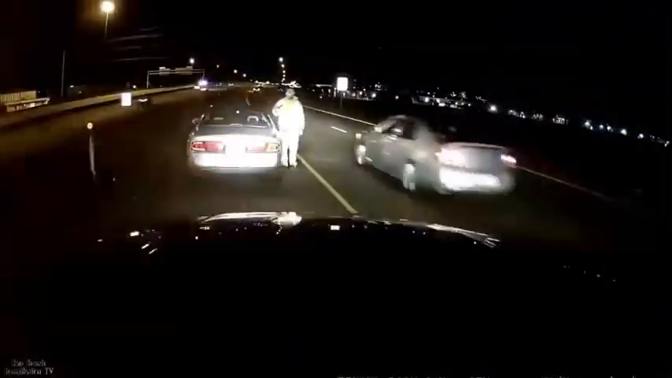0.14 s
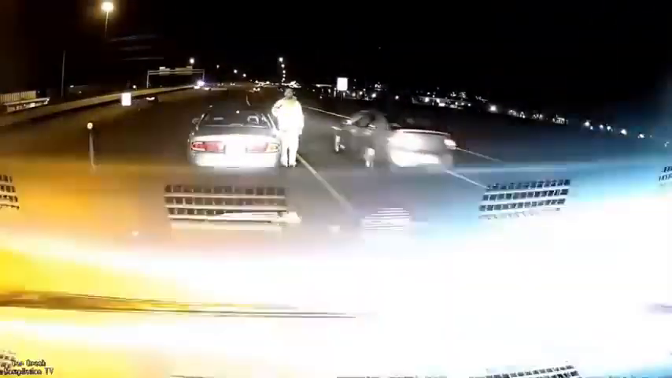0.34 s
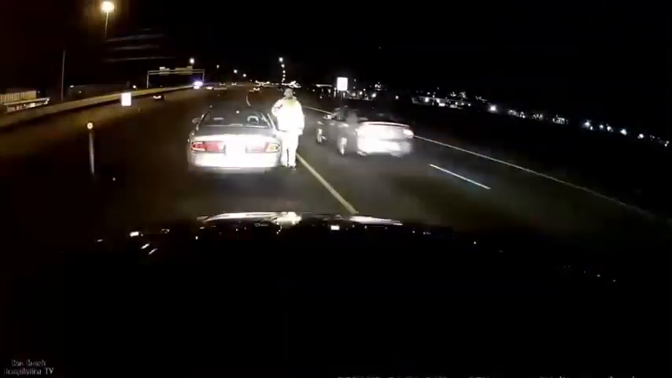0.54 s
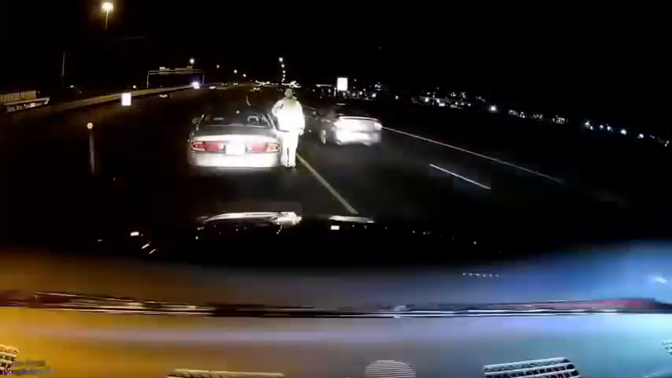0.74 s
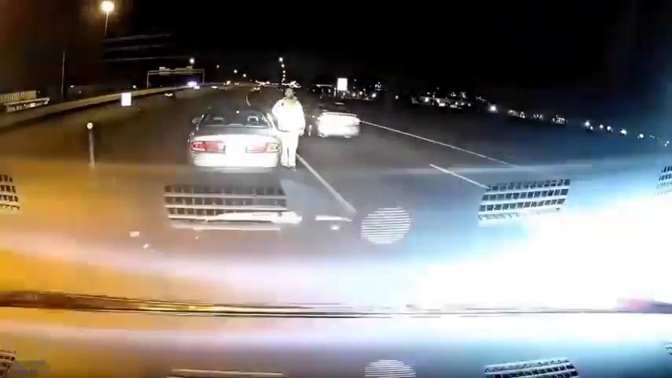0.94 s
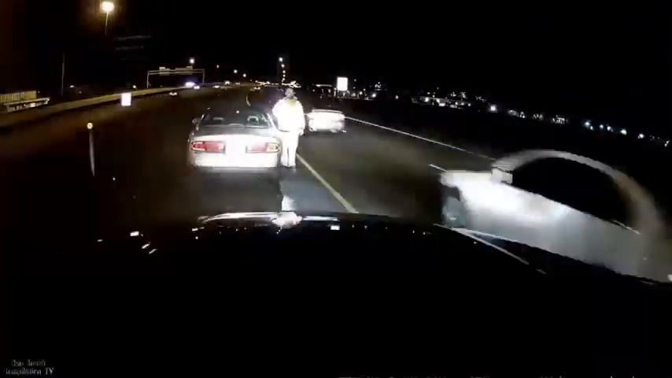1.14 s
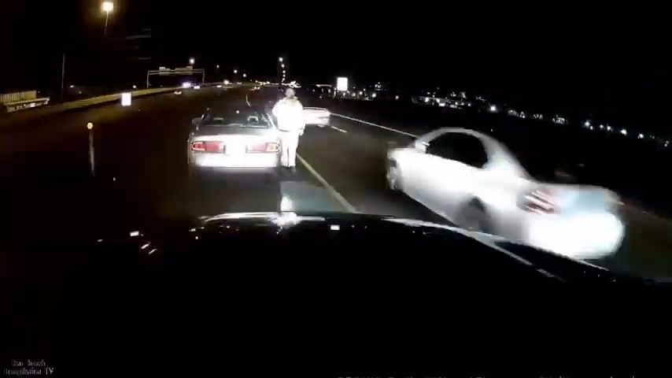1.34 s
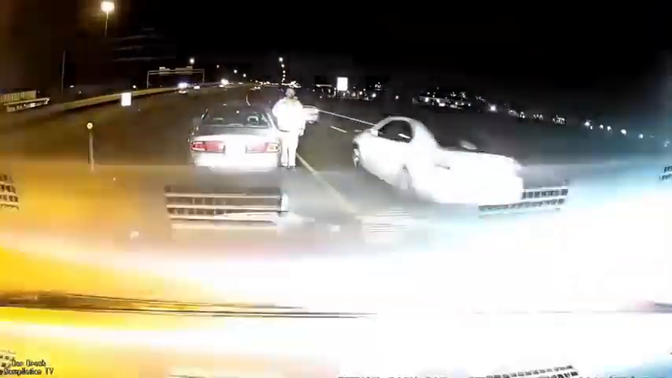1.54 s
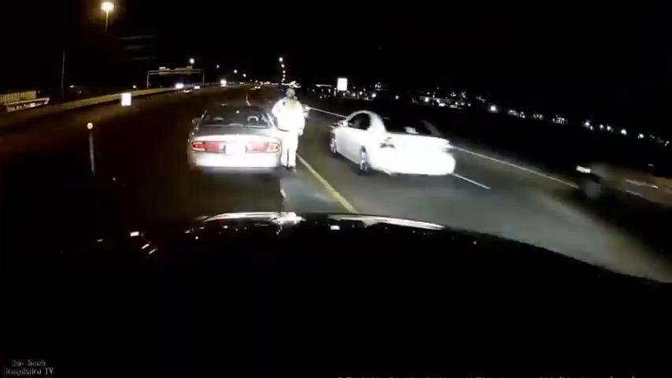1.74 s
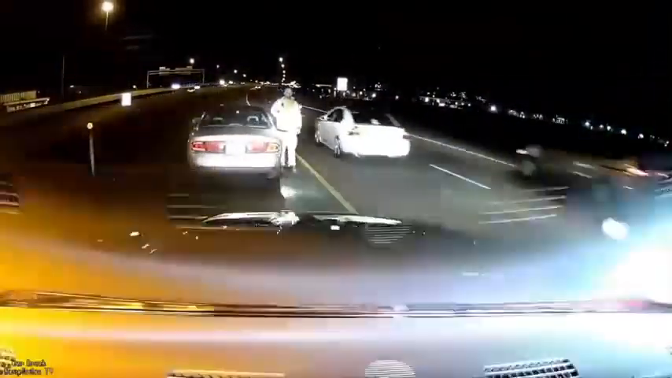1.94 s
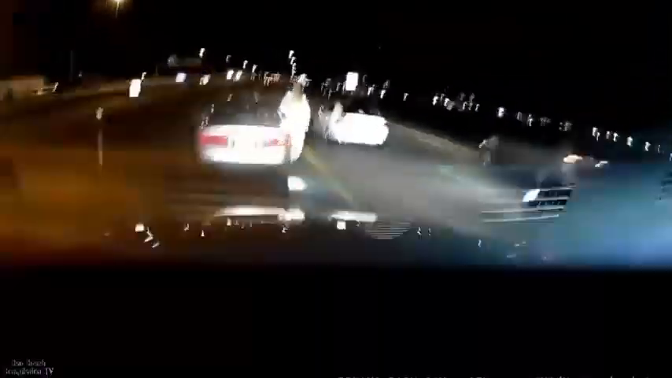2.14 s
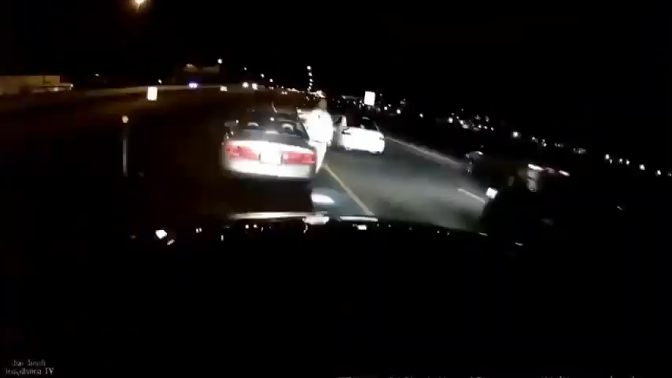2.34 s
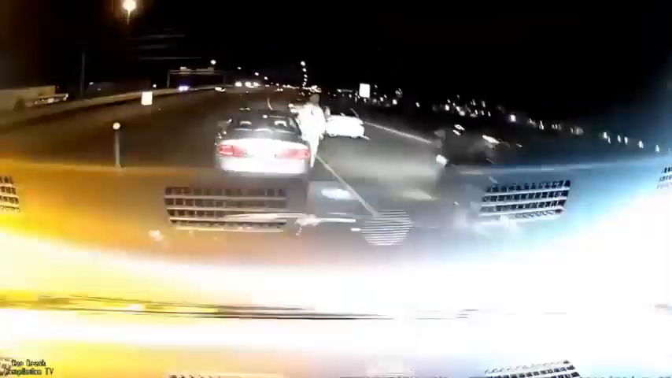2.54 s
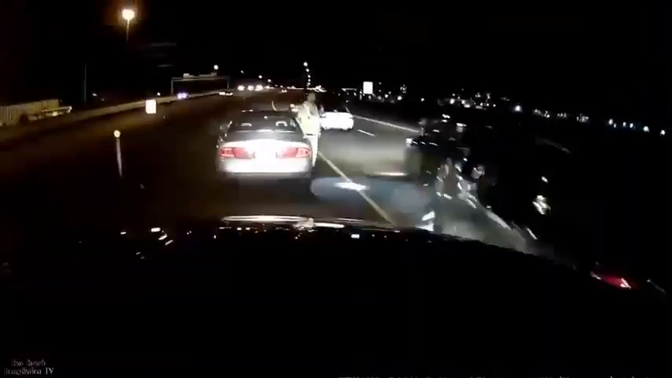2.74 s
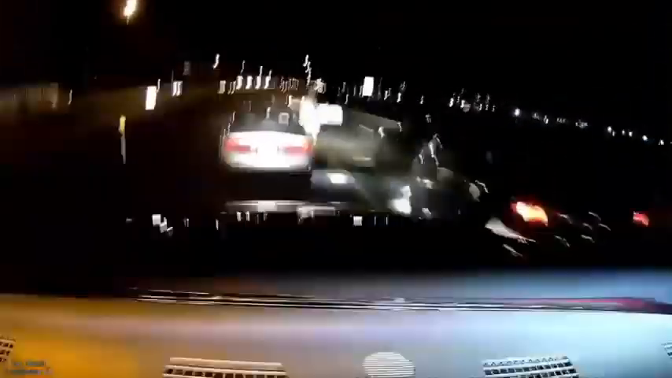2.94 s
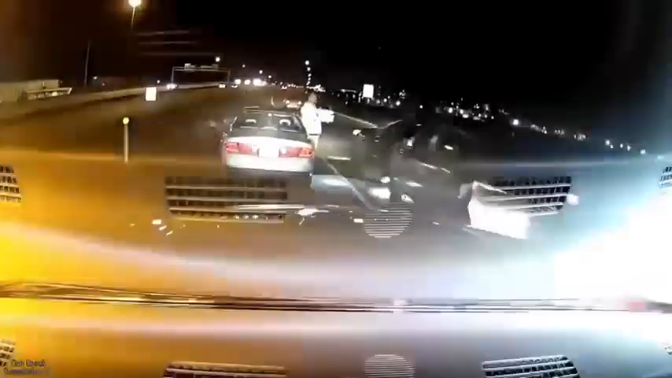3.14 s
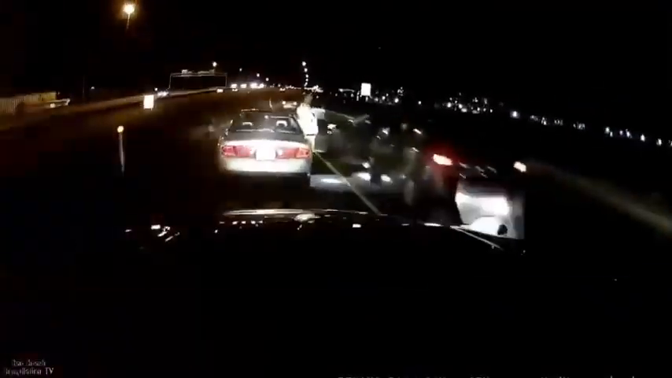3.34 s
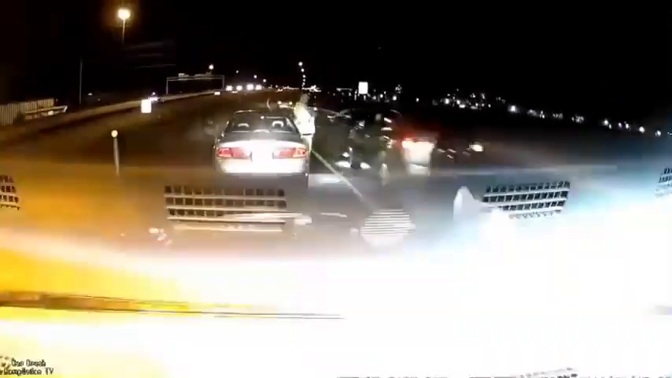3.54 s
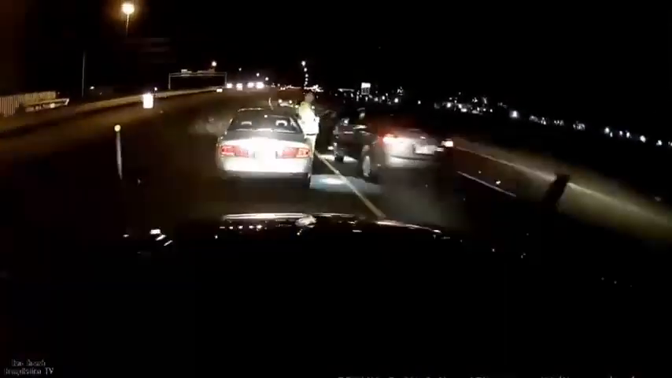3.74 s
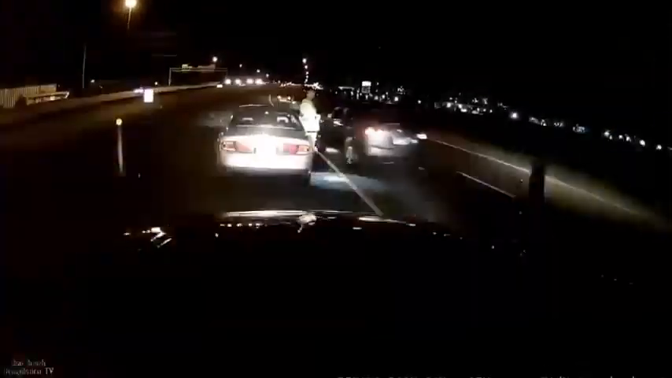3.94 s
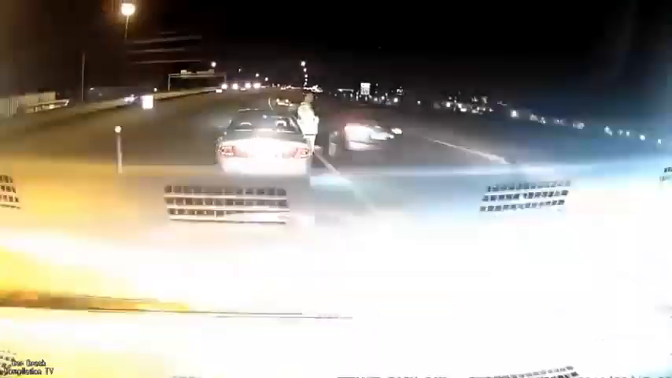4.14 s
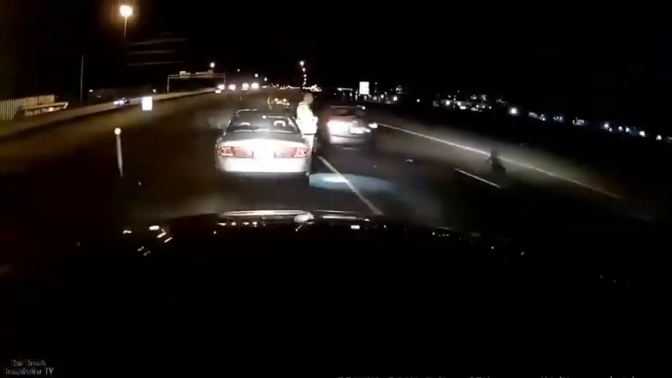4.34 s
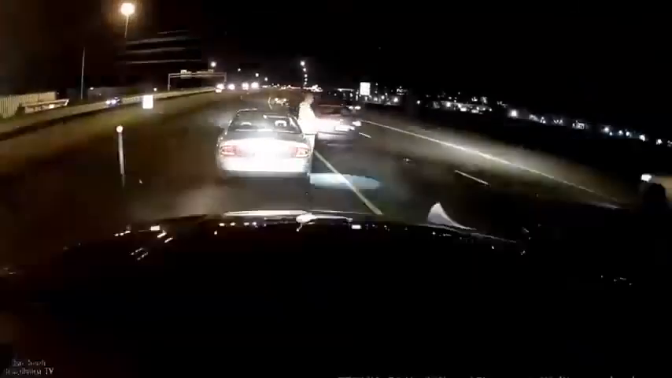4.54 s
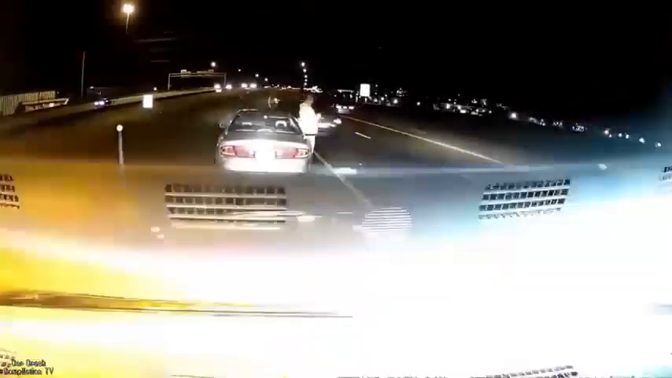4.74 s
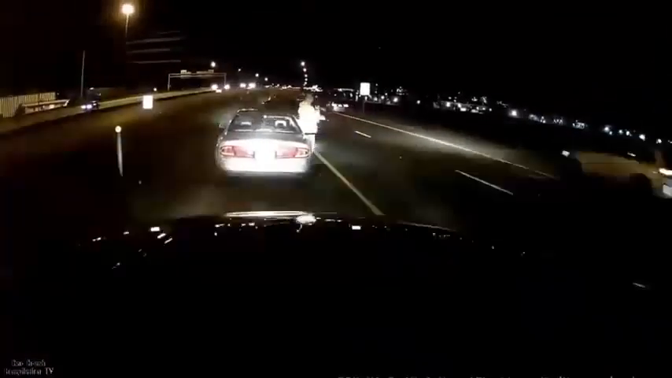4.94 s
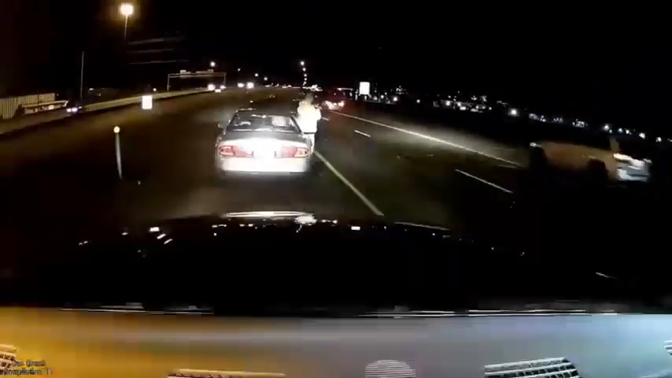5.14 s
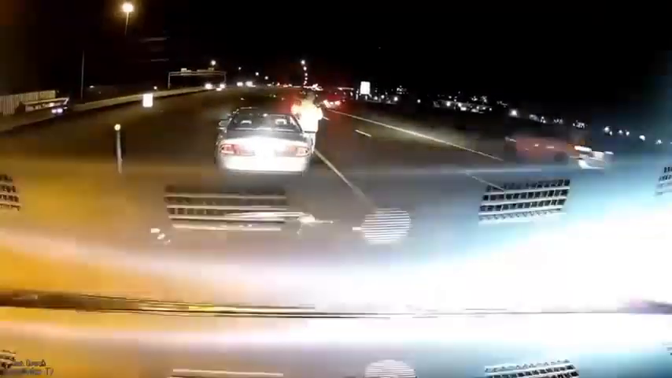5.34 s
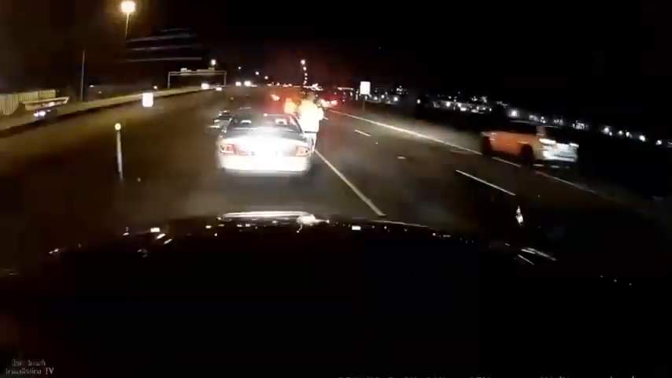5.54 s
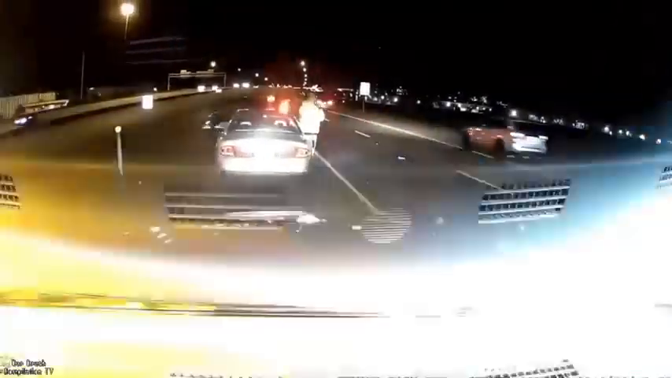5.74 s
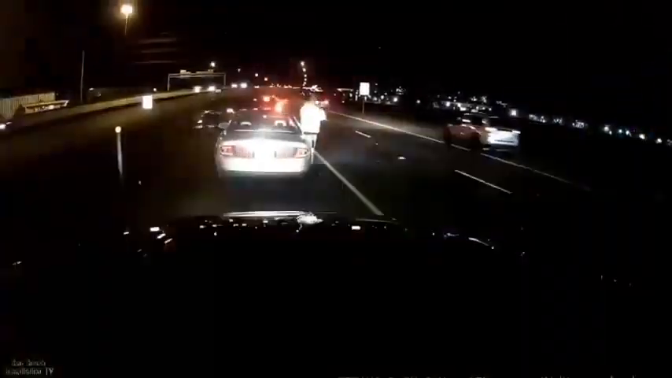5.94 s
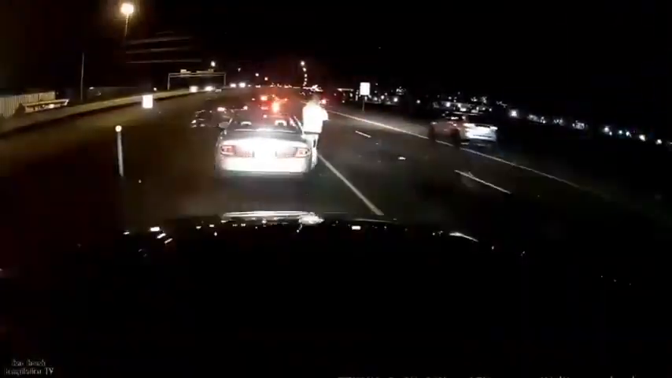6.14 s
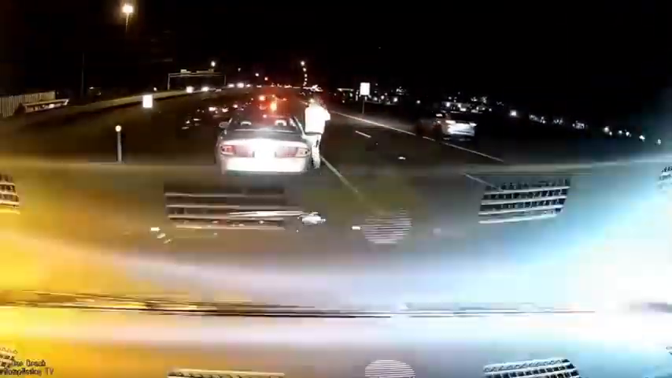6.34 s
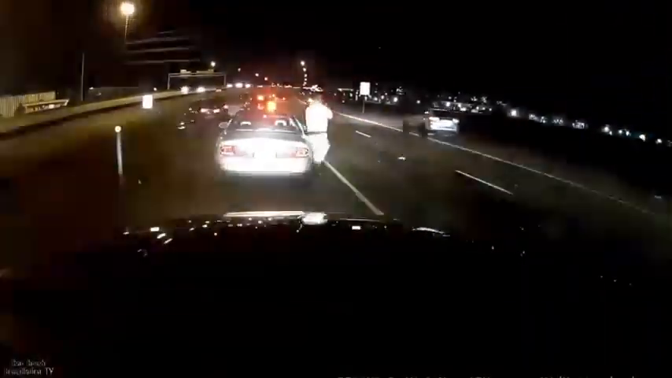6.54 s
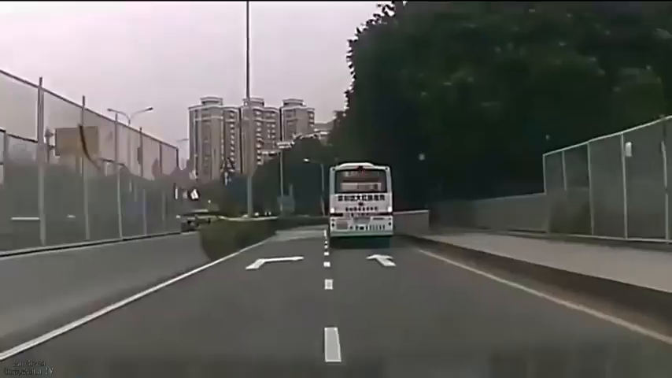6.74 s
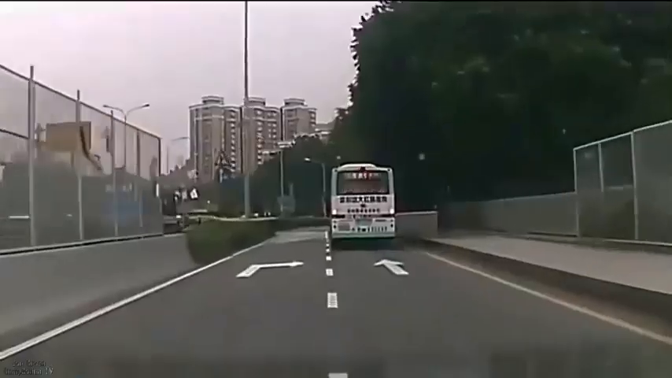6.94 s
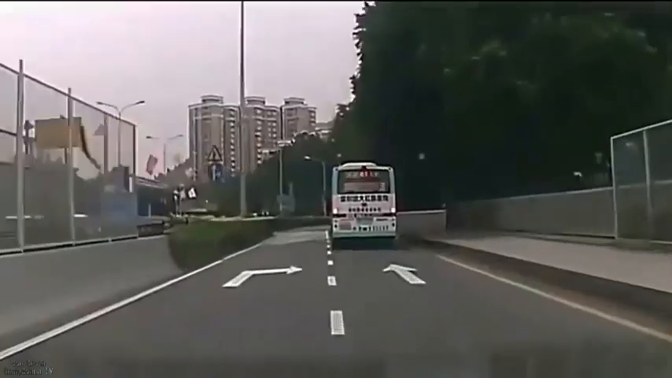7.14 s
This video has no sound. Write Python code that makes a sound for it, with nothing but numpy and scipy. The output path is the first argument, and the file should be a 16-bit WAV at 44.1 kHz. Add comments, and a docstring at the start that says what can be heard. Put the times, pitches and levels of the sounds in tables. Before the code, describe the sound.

Inside an idling car on a highway shoulder, tyres roar past and brakes chirp faintly. A sudden, loud crash booms alongside: metal crumples, glass bursts and hard, bright knocks overload the dashboard microphone. Muffled tyres squeal in a skid, a loose piece scrapes faintly and small debris clinks down. The sound cuts off and the soft rumble of another car fades in.

```python
"""A highway shoulder at night, heard from the dashboard camera of an idling car. Tyres roar past and
brakes chirp, then a car crashes alongside: its body booms, panels buckle, glass bursts, and hard knocks
on the camera housing overload the microphone. Tyres stick and slip in a skid, a loose piece scrapes
along the road and debris clinks down. The scene then cuts to the soft rumble of another car on the move."""
import sys
import numpy as np
from scipy import signal
from scipy.fft import rfft, irfft, next_fast_len
from scipy.io import wavfile
from scipy.ndimage import map_coordinates

SR = 44100
rng = np.random.default_rng(int(sys.argv[2]) if len(sys.argv) > 2 else 0)


def generate_wav(signal):
    """Clip the signal to [-1, 1] and save it as 16-bit WAV at the path in sys.argv[1]."""
    frames = np.transpose(np.atleast_2d(signal))
    scaled = np.clip(frames, -1, 1) * 32767
    pcm = np.round(scaled).astype(np.int16)
    wavfile.write(sys.argv[1], SR, pcm)


N = 321165
TIME = np.arange(N) / SR


def amp(db):
    """Decibels to gain."""
    return 10 ** (np.asarray(db) / 20)


def unit(x):
    """x at rms 1."""
    return x / np.sqrt(np.mean(x ** 2) + 1e-20)


def noise():
    """White noise of rms 1."""
    return rng.standard_normal(N)


def wobble(rate):
    """A smooth random curve, rate knots a second."""
    return map_coordinates(rng.standard_normal(int(N * rate / SR) + 4), [TIME * rate])


def crackle(rate, spread_db):
    """Noise in clumps of uneven size, rate clumps a second."""
    return unit(noise() * amp(spread_db * np.clip(wobble(rate), -2, 2)))


def snaps(rate, spread_db, t60):
    """Noise of rms 1 made of sharp, dying snaps of uneven size, rate a second."""
    size = amp(spread_db * np.clip(noise(), -2, 2))
    onsets = rng.random(N) < rate / SR
    power = signal.lfilter([1], [1, -amp(-60 / (t60 * SR)) ** 2], onsets * size ** 2)
    return unit(np.sqrt(power) * noise())


def eq(x, curve, bells=()):
    """Causal EQ of unit power: a curve of (f/Hz, level/dB) plus bells of (f/Hz, width/Hz, gain/dB)."""
    size = 2 * next_fast_len(N // 2 + 8192)
    hz = np.fft.rfftfreq(size, 1 / SR)
    curve_hz, curve_db = np.transpose(curve)
    db = np.interp(np.log(hz + 1), np.log(curve_hz), curve_db)
    for centre, width, gain in bells:
        db = db + gain / (1 + (2 * (hz - centre) / width) ** 2)
    cepstrum = irfft(np.log(np.maximum(unit(amp(db)), 1e-6)))
    cepstrum[1:size // 2] *= 2  # minimum phase: nothing rings ahead of a hit
    cepstrum[size // 2 + 1:] = 0
    return irfft(rfft(x, size) * np.exp(rfft(cepstrum)), size)[:N]


def strikes(rows, attack_s):
    """Percussive envelope of hits: (t/s, level/dB, t60/s)."""
    power, t = np.zeros(N + SR), np.arange(SR // 2) / SR
    for start, db, t60 in rows:
        hit = amp(db - 60 * t / t60) * (1 - np.exp(-t / attack_s))
        power[round(start * SR):][:len(t)] += hit ** 2
    return np.sqrt(power[:N])


def swells(rows, attack_s, fall_db_per_s):
    """Attack-hold-release envelope of swells: (t/s, level/dB, hold/s)."""
    power = np.zeros(N)
    for start, db, hold in rows:
        t = np.maximum(TIME - start, 0)
        swell = amp(db - fall_db_per_s * np.maximum(t - hold, 0)) * (1 - np.exp(-t / attack_s))
        power += swell ** 2
    return np.sqrt(power)


# Cabin bed of idle and distant traffic: f/Hz, level/dB
CABIN_EQ = [(25, -3.5), (130, -11.5), (205, -4), (300, -10.5), (450, -12.5), (900, -8.5), (1500, -15.5),
            (2000, -28.5), (3000, -30.5), (5000, -40), (6500, -46), (15500, -50.5)]
# Tone of the tyre roar: f/Hz, level/dB
ROAR_EQ = [(25, -13), (80, -7), (220, -5), (600, -7), (1600, -7.5), (2000, -14), (3100, -16), (5000, -30),
           (6500, -42), (15000, -46.5)]
# Pass-bys: nearest at t/s, relative level/dB, time to travel their distance from the cabin/s
PASS_BYS = [(1.13, -30, .04), (1.212, -24.5, 0.053), (1.61, -32, 0.14), (1.92, -29.5, .13),
            (3.9, -36, 0.91)]
# Thin whine of the camera electronics: f/Hz, level/dB
WHINE_TONES = [(7214, -69), (14422, -79.5)]


def traffic():
    """The idle drones in the cabin's air mode under a faint whine; tyre roar swells as each car nears."""
    cabin = eq(noise(), CABIN_EQ, [(212.2, 82, 9), (1108, 210, -8), (1463, 47, 4.5)])
    rasp = crackle(rate=170, spread_db=1.5)
    roar = eq(rasp, ROAR_EQ, [(356, 96, 8), (1277, 51, 6.5), (2100, 510, -5)])
    far_lanes = (1.3, -39, 1.1)  # a pack of cars as one slow pass-by
    power = 0
    for nearest, db, width in PASS_BYS + [far_lanes]:
        distance = np.hypot(1, (TIME - nearest) / width)
        power += (amp(db) / distance ** 2.5) ** 2
    whine = sum(amp(db) * np.sqrt(2) * np.sin(2 * np.pi * hz * TIME + 0.25 * wobble(40))
                for hz, db in WHINE_TONES)
    return amp(-34.5) * cabin + amp(-3.5) * np.sqrt(power) * roar + whine


# Low, soft push of air: f/Hz, level/dB
WHOOSH_EQ = [(30, 2), (400, 2), (1200, -47)]


def whoosh():
    """The closest car shoves air against the cabin."""
    gust = np.exp(-((TIME - 1.215) / 0.1) ** 2)
    return amp(-31.5) * gust * eq(noise(), WHOOSH_EQ)


# Brake chirps, then the skid after the crash: t/s, level/dB, hold/s, f/Hz
TYRE_SQUEALS = [(1.44, -48.5, 0.062, 969), (1.56, -46, .09, 1000), (1.959, -50.5, 0.098, 745),
                (3.22, -43.5, 0.11, 816.5), (3.37, -42, 0.18, 807.6), (3.617, -44.5, 0.159, 821.5),
                (3.827, -46, 0.2, 792.5), (4.112, -51.5, 0.11, 858)]
# Friction on asphalt, shared with scrape(): f/Hz, level/dB
FRICTION_EQ = [(1800, -23.5), (2700, -3.5), (3300, -2), (4200, -15), (6500, -34.5)]
IMPACT_S = 2.09


def skid():
    """Two tyres stick and slip, one near the note, one wandering above; before the impact they rasp."""
    starts, _, holds, hz = np.transpose(TYRE_SQUEALS)
    slip = swells([row[:3] for row in TYRE_SQUEALS], attack_s=0.0053, fall_db_per_s=105)
    edges = np.sort(np.concatenate([starts, starts + holds]))
    note = np.interp(TIME, edges, np.repeat(hz, 2))  # held through each squeal
    squeal = 0
    for ratio, wander, harmonics_db in [(1, 0.006, [0, -3.3, -22.5]), (1.07, 0.022, [-5.5, -6])]:
        pitch = ratio * note * (1 + wander * wobble(12) + 0.013 * wobble(300))
        phase = 2 * np.pi * np.cumsum(pitch) / SR
        for k, db in enumerate(harmonics_db, 1):
            squeal += amp(db + 3.2 * wobble(70)) * np.sin(k * phase)
    muffled = eq(slip * unit(squeal), [(1750, 1), (2100, -11.5)])  # through closed windows
    rasp = eq(noise(), FRICTION_EQ, [(2380, 47, 21), (2834, 110, 11)])
    return muffled + (TIME < IMPACT_S) * slip * rasp


# Tails of the hits, from heavy panels to lighter pieces: t/s, t60/s
HIT_TAILS = [(2.4, 0.1), (3.0, 0.073)]
HIT_ATTACK_S = 0.0029


def hit_t60(start):
    """How long a hit at this moment rings."""
    return np.interp(start, *np.transpose(HIT_TAILS))


def clangs(hits, count, low_hz, high_hz):
    """Every hit (t/s, level/dB) finds another piece, which rings with its own handful of modes."""
    out, t = np.zeros(N + SR), np.arange(SR // 3) / SR
    for start, db in hits:
        place, phase, size = rng.random((3, count, 1))
        hz = low_hz * (high_hz / low_hz) ** place
        modes = size * np.sin(2 * np.pi * (hz * t + phase))
        envelope = amp(db - 60 * t / hit_t60(start)) * (1 - np.exp(-t / HIT_ATTACK_S))
        out[round(start * SR):][:len(t)] += envelope * unit(modes.sum(axis=0))
    return out[:N]


# Crash hits, shared with glass(): t/s, shard level/dB, panel level/dB
CRASH_HITS = [(2.053, -37, -19.5), (2.092, -25, -14), (2.148, -32.5, -18.5), (2.208, -33, -26),
              (2.225, -29.5, -21), (2.252, -30, -9), (2.307, -31, -18), (2.362, -28, -34),
              (2.404, -26, -20), (2.526, -22.5, -18.5), (2.628, -51, -24.5), (2.6606, -37.5, -20.5),
              (2.828, -11, -15), (2.9404, -36, -23.5), (3.009, -26, -18), (3.022, -17, -36),
              (3.040, -15.5, -18.5), (3.098, -23.5, -28), (3.116, -20, -34), (3.1998, -20.5, -21),
              (3.273, -32.5, -14.5), (3.34, -32.5, -20), (3.871, -29.5, -21)]
# Bodywork folding up: t/s, panel level/dB, shard level/dB, hold/s
CRUNCHES = [(2.085, -28.5, -41.5, 0.18), (2.242, -13.5, -25, 0.068), (2.415, -26.5, -43, 0.026),
            (2.755, -22, -33, 0.12)]
# Body of the sheet metal: f/Hz, level/dB
PANEL_EQ = [(100, -30.5), (300, -4), (600, 0), (1600, -7), (2100, -18), (3000, -17), (6000, -55.5)]
# Bite of glass and plastic, shared with debris(): f/Hz, level/dB
SHARD_EQ = [(1000, -21), (1800, -0.5), (3000, 2.5), (4000, -3), (5200, -3.5), (6500, -16), (12000, -21),
            (15500, -29)]


def wreck():
    """Panels buckle in dense snaps, glass and plastic splinter, and the wreck slides on down the road."""
    attack_s, fall_db_per_s = 0.0037, 232
    slide = swells([(IMPACT_S, 0, 1.11)], attack_s, fall_db_per_s=54)
    crush = swells([(s, db, hold) for s, db, _, hold in CRUNCHES], attack_s, fall_db_per_s)
    crush = np.hypot(crush, amp(-32) * slide)
    shatter = swells([(s, db, hold) for s, _, db, hold in CRUNCHES], attack_s, fall_db_per_s)
    shatter = np.hypot(shatter, amp(-39) * slide)
    panel = crush + strikes([(s, db, hit_t60(s)) for s, _, db in CRASH_HITS], HIT_ATTACK_S)
    shard = shatter + strikes([(s, db, hit_t60(s)) for s, db, _ in CRASH_HITS], HIT_ATTACK_S)
    buckling = panel * snaps(rate=460, spread_db=2, t60=0.023)
    metal = eq(buckling, PANEL_EQ, [(1140, 170, 3.5), (1620, 510, 2)])
    splinters = eq(shard * snaps(rate=1100, spread_db=3, t60=0.01), SHARD_EQ)
    air = eq(noise(), [(120, -18), (255, -0.5), (310, -9.5), (440, -9.5), (700, -28.5), (2000, -66)])
    drum = amp(13.5) * crush ** 1.7 * air  # only the hardest crushing drums the cabin air
    ring = clangs([(s, db) for s, _, db in CRASH_HITS], count=10, low_hz=748, high_hz=1908)
    return metal + ring + splinters + drum


# Sprays of fine glass: t/s, level/dB, t60/s
GLASS_SPRAYS = [(2.528, -33.5, 0.23), (2.756, -20, 0.047), (3.208, -35.5, 0.13), (3.40, -42, 0.14),
                (5.44, -38, 0.17)]
# Their top-end sparkle: f/Hz, level/dB
GLITTER_EQ = [(3000, -21.5), (8000, -0.5), (14000, -1.5)]


def glass():
    """Larger shards ring briefly at each hit; sprays of fine splinters glitter above them."""
    shards = clangs([(s, db) for s, db, _ in CRASH_HITS], count=7, low_hz=2425, high_hz=5640)
    spray = strikes(GLASS_SPRAYS, HIT_ATTACK_S) * snaps(rate=700, spread_db=1.5, t60=0.006)
    return amp(-3) * shards + eq(spray, GLITTER_EQ)


# Low-end weight of the car body: f/Hz, level/dB
BOOM_EQ = [(12, -9.5), (38, 4.5), (75, 0.5), (270, -14), (600, -28.5), (1200, -64)]
# Heaves of the body: t/s, level/dB, hold/s
BODY_HEAVES = [(2.09, -6, 0.28), (2.545, -17, 0.044), (2.815, -22, 0.02), (2.935, -23.5, 0.015),
               (3.21, -32.5, 0.11), (3.7, -40.5, 0.071), (5.17, -41.5, .06)]
# Cabin pressure punches that choke the microphone: t/s, level/dB, half length/s
PRESSURE_JOLTS = [(2.094, 4, 0.00079), (2.203, 8.5, 0.0028), (2.355, 14, 0.0022), (2.400, 17.5, 0.0027)]


def boom():
    """The impact heaves the car body, which goes on shaking; each jolt pushes air that leaks back."""
    shake = signal.hilbert(eq(noise(), BOOM_EQ))
    # a heavy body swings in lurches of similar strength
    sway = unit(amp(2.8 * wobble(35)) * shake.real / (np.abs(shake) + 1))
    heave = swells(BODY_HEAVES, attack_s=0.011, fall_db_per_s=78)
    jolts = sum(amp(db) * np.exp(-((TIME - s) / width) ** 2) for s, db, width in PRESSURE_JOLTS)
    leak = signal.butter(1, 2, "highpass", fs=SR)
    return heave * sway - signal.lfilter(*leak, jolts)


# Small pieces landing: t/s, relative ring level/dB, tick level/dB, f/Hz
LANDINGS = [(2.742, -19, -31, 2940), (2.801, -15, -26, 4500), (2.993, -24, -41, 4330),
            (3.036, -6.5, -36, 1600), (3.171, -22, -44, 2800), (3.5523, -32, -56, 1830),
            (3.5768, -26, -39.5, 2852), (3.6588, -26.5, -49, 1760), (3.7677, -31.5, -44.5, 1736),
            (3.908, -28.5, -61, 2550), (4.129, -27, -52, 1687), (4.15, -33, -56, 3400),
            (4.323, -30.5, -59, 2920), (4.463, -32.5, -57, 3320), (4.485, -37, -59.5, 3070),
            (4.573, -27.5, -57, 2870), (4.668, -37.5, -62, 4080), (5.429, -36, -36, 4290),
            (5.439, -24.5, -32, 5400), (5.6833, -24.5, -49, 3120), (5.7016, -37, -60, 3040),
            (5.719, -29.5, -64, 4840), (5.781, -34, -42, 1870), (5.966, -32.5, -61, 1880),
            (6.111, -38, -61.5, 1853), (6.4507, -20, -34, 1820), (6.6023, -33.5, -55, 1800)]
# Modes of one piece: multiple of its pitch, relative level/dB
PIECE_MODES = [(1, 12), (1.28, 6.5), (2.5, 2.5), (2.849, 4.5)]


def debris():
    """Each piece lands with a tick and rings a few modes; a shower of crumbs thins to a trickle."""
    rings, t = np.zeros(N + SR), np.arange(SR // 4) / SR
    hz = np.fft.rfftfreq(len(t), 1 / SR)
    for start, db, _, pitch in LANDINGS:
        modes = sum(amp(gain + 2 * rng.standard_normal()) / (1 + 1j * (hz - ratio * pitch) / 170)
                    for ratio, gain in PIECE_MODES)
        dulled = modes / (1 + (hz / 5800) ** 10)  # closed windows dull the highest modes
        ring = unit(irfft(rfft(rng.standard_normal(len(t))) * dulled, len(t)))
        rings[round(start * SR):][:len(t)] += amp(db - 6.5 - 60 * t / 0.061) * ring
    contacts = strikes([(s, db, 0.045) for s, _, db, _ in LANDINGS], attack_s=0.00046)
    grit = contacts * crackle(rate=790, spread_db=3)
    ticks = eq(grit, [(1500, -6.5), (4500, -1), (12000, 1), (15500, -8)])
    shower_s, fall_db_per_s, trickle_db = 3.5, 16, -60.5
    shower = amp(-47.5 - fall_db_per_s * (TIME - shower_s))
    crumb_level = (TIME > shower_s) * np.hypot(shower, amp(trickle_db))
    crumbs = eq(snaps(rate=42, spread_db=3, t60=0.021), SHARD_EQ)
    return rings[:N] + ticks + crumb_level * crumbs


# Knocks on the camera housing: t/s, level/dB, t60/s
HOUSING_KNOCKS = [(2.8247, 9, 0.011), (2.8285, 7, 0.017), (2.8406, 2.5, 0.012), (2.8435, 1.5, 0.015),
                  (2.856, -7.5, 0.023), (2.8667, -14.5, 0.036), (2.8735, -11.5, 0.032), (2.8982, -2, 0.015),
                  (2.905, -3.5, 0.0082)]
# Brittle tone of the housing: f/Hz, level/dB
HOUSING_EQ = [(400, -13.5), (1500, -11.5), (2300, -18.5), (3100, -2), (5000, -3), (6200, -5.5),
              (7400, -1.5), (14000, -5), (16000, -12.5)]


def rattle():
    """A quick run of hard, bright knocks rings the housing right at the microphone."""
    knocks = strikes(HOUSING_KNOCKS, attack_s=0.00034) * noise()
    return eq(knocks, HOUSING_EQ, [(1680, 280, 19), (5150, 260, 8.3), (7410, 450, 6.5)])


def scrape():
    """A light, loose piece slides over the asphalt with a gritty, narrow hiss, then stops."""
    sliding = swells([(3.54, -53.5, 1)], attack_s=0.12, fall_db_per_s=88)
    return sliding * eq(snaps(rate=220, spread_db=6, t60=0.037), FRICTION_EQ)


# Dark rumble of the other car: f/Hz, level/dB
RIDE_EQ = [(25, -10), (100, 0), (170, -12), (350, -15), (600, -25), (1200, -29), (1600, -44), (2200, -45),
           (5000, -73)]


def ride():
    """The muffled engine and road rumble of another car fades in."""
    start_s, fade_s = 6.79, 0.43
    fade = np.clip((TIME - start_s) / fade_s, 0, 1) ** 1.03
    return amp(-43.5) * fade * eq(noise(), RIDE_EQ, [(101.5, 36, 3.69)])


def scene():
    """The highway up to a hard cut, then the other car."""
    cut_s = 6.688
    highway = traffic() + boom() + wreck() + rattle() + debris() + skid() + glass() + scrape() + whoosh()
    return (highway * (TIME < cut_s) + ride())[None]


def record(dry):
    """The camera saturates just under full scale, then rolls off steeply above its band limit."""
    ceiling, top_hz = 0.98, 15750
    saturated = dry / (1 + np.abs(dry / ceiling) ** 14) ** (1 / 14)
    size = next_fast_len(N + SR // 2)
    lowpass = 1 / (1 + (np.fft.rfftfreq(size, 1 / SR) / top_hz) ** 120)
    return irfft(rfft(saturated, size) * lowpass, size)[..., :N]


dry = scene()
out = record(dry)
generate_wav(out)
```